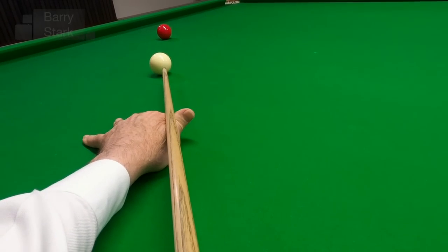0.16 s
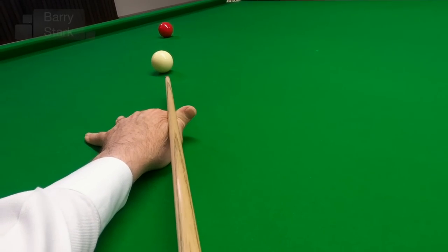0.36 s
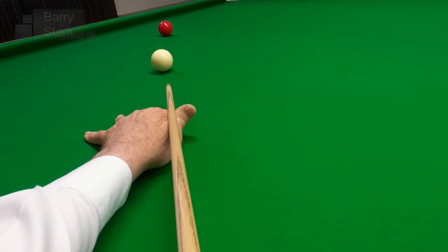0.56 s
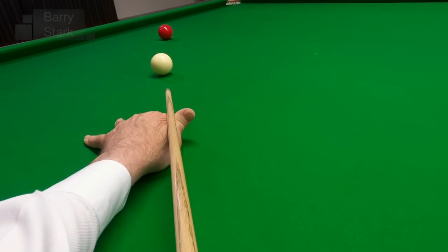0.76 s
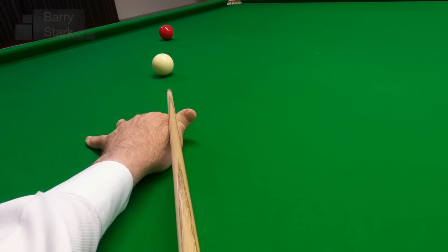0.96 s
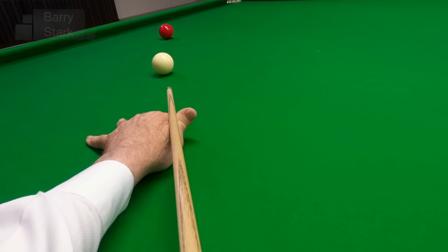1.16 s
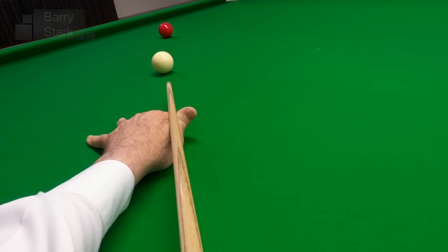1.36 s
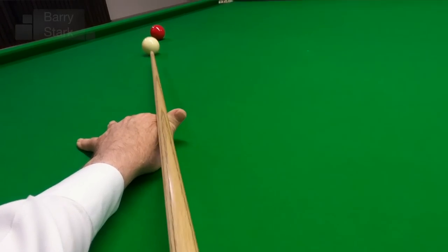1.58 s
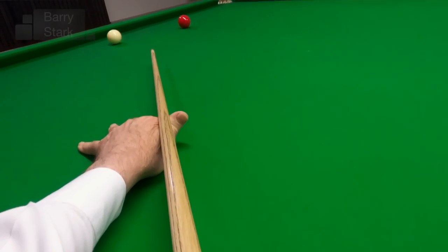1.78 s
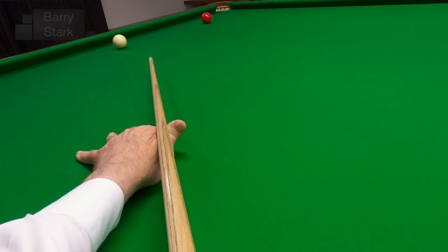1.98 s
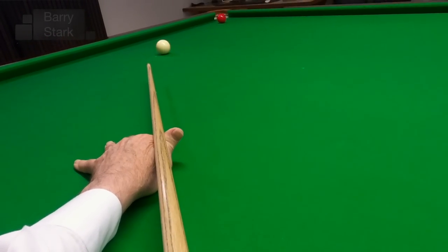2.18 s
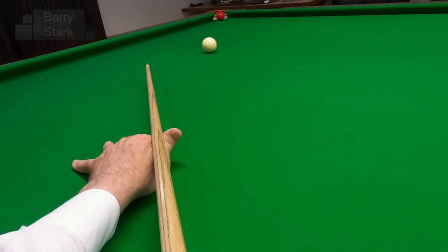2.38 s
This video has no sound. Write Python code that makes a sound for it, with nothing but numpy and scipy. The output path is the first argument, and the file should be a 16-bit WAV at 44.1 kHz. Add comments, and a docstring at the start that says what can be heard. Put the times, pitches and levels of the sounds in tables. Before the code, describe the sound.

A snooker shot, heard close behind the cue in a quiet hall: a woody crack, a sharp ball-on-ball click with a bright echo, then low rolling over cloth and three soft cushion thuds.

```python
"""A faint hum fills a quiet hall, and a snooker cue hisses softly over the player's hand.
Heard from just behind, the cue cracks against the white ball and its wooden shaft rings.
The white knocks down on the table, skids on the cloth and clicks against a red.
The hall answers with a long bright echo while the balls rumble over the slate
and, after a soft falling swish begins, thud into the rubber cushions."""
import sys
import numpy as np
from scipy import signal
from scipy.fft import rfft, irfft
from scipy.io import wavfile

SR = 44100
rng = np.random.default_rng(int(sys.argv[2]) if len(sys.argv) > 2 else 0)


def dump_mix(stems):
    """Bounce the given channels to the path in sys.argv[1] as a 16-bit WAV at rate SR."""
    frames = np.atleast_2d(stems).T  # one column per channel
    limited = np.clip(frames, -1, 1)  # hard clip at full scale
    pcm = np.round(limited * 32767).astype(np.int16)
    wavfile.write(sys.argv[1], SR, pcm)


N = 107295
T = np.arange(N) / SR
HZ = np.maximum(np.fft.rfftfreq(2 * N, 1 / SR), 1)

# Stereo width of the air and hiss (higher is wider): pitch_hz, side_db
AIR_WIDTH = [(60, -9.5), (250, 1), (700, -7), (2400, -5), (15000, -24.5)]
# Three blows, as the tip strikes and the white lands and settles:
# start_s, crack_db, shaft_db, knock_db, boom_db, brightness_db, thump_db, thump_hz, thump_fade_s
CUE_BLOWS = [(1.5630, -5, -16, -33.5, -42.5, -6, -18, 171, 0.07),
             (1.5930, -11.5, -26.5, -16.5, -40.5, 4, -24, 183, 0.099),
             (1.6215, -40, -42, -30.5, -45.5, -5, -27, 220, 0.27)]
# The deep notes of the table's boom: pitch_hz, level_db, fade_s
TABLE_NOTES = [(59.1, 2.5, 0.8), (97.6, -2, 1), (132.6, -15, 0.66), (182.2, -2, 1), (217.2, 5.5, 1),
               (329, 5.5, 0.1), (498, -4.5, 0.18), (643, -7.5, 0.14)]
# Stereo width of sound in the hall: pitch_hz, side_db
HALL_WIDTH = [(60, -32), (200, -29), (400, -15), (700, -17), (1300, -8.5), (2400, -4), (15000, -5.5)]


def amp(db):
    """Turn decibels into a number to multiply by."""
    return 10 ** (np.asarray(db) / 20)


def unit(x):
    """Scale a sound to an average (rms) strength of 1."""
    return x / np.sqrt(np.mean(x ** 2) + 1e-30)


def at_hz(tone):
    """Join (pitch_hz, level_db) points into a smooth curve over all pitches."""
    hz, db = np.transpose(tone)
    return np.interp(np.log(HZ), np.log(hz), db)


def level(points):
    """Join (time_s, level_db) points into a volume curve."""
    return amp(np.interp(T, *np.transpose(points)))


def delay(x, s):
    """Start a sound s seconds later."""
    return np.concatenate([np.zeros(max(round(s * SR), 0)), x])[:N]


def through(x, response):
    """Play a sound through something, given how that thing answers a single tap."""
    return signal.fftconvolve(np.atleast_2d(x), np.atleast_2d(response), axes=-1)[:, :N]


def noise(tone, width):
    """Stereo noise: a middle part both ears share, plus a side part that sets them apart."""
    white = rfft(rng.standard_normal((2, 2 * N)))
    mid, side = irfft(white * amp([at_hz(tone), at_hz(tone) + at_hz(width)]))[:, :N]
    return unit(np.array([mid + side, mid - side]))


def shortest_tap(tone):
    """The briefest tap that has the given tone (a minimum-phase response)."""
    cepstrum = irfft(np.log(amp(at_hz(tone))))
    cepstrum[1:N] *= 2  # fold what would come before the tap to after it
    cepstrum[N + 1:] = 0
    return irfft(np.exp(rfft(cepstrum)))[:N]


def pulse(tone):
    """One brief tap with a peak of 1."""
    tap = shortest_tap(tone)
    return tap / np.abs(tap).max()


def dying(fade_s):
    """A fade that drops 60 dB in fade_s seconds."""
    return amp(-np.minimum(60 * T / max(fade_s, 1e-4), 400))


def ring(hz, fade_s):
    """One struck note dying away."""
    return np.sin(2 * np.pi * hz * T) * dying(fade_s)


def body(notes):
    """All the notes of a struck object at once, every second one flipped upside down."""
    return sum((-1) ** k * amp(db) * ring(hz, fade_s) for k, (hz, db, fade_s) in enumerate(notes))


def room_hum():
    """The building gives a deep wavering hum, and the room's air swells softly."""
    # Loudness of the hum: time_s, level_db
    hum_levels = [(0, -51.5), (.17, -51.5), (.42, -63.5), (.56, -53), (.75, -53), (.97, -61), (1.25, -57),
                  (2.43, -62)]
    # Tone of the air: pitch_hz, level_db
    air_tone = [(25, -1), (55, 7), (85, -7), (130, -6.5), (200, -5), (290, -5.5), (400, -13), (600, -16.5),
                (3000, -26.5), (5400, -25), (15000, -34)]
    # Rise and fall of the air: time_s, boost_db
    air_swell = [(0, 5.5), (.35, 3.5), (.68, 0.5), (.95, 5.5), (1.2, 2), (1.5, 3), (2.43, 1.5)]
    hum_hz, air_db = 25.7, -66.5
    hum = np.sqrt(2) * level(hum_levels) * np.sin(2 * np.pi * hum_hz * T)
    return hum + amp(air_db) * level(air_swell) * noise(air_tone, AIR_WIDTH)


def cue_slide():
    """The cue hisses as it slides over the hand."""
    # Tone of the hiss: pitch_hz, level_db
    hiss_tone = [(1500, -3), (3800, -4), (5200, -1.5), (8200, -9), (10000, -13.5), (15000, -26)]
    # Loudness of the hiss: time_s, level_db
    hiss_levels = [(0, -90), (.25, -74), (.42, -73), (.7, -80), (.93, -84.5), (1.2, -105), (1.52, -66),
                   (1.6, -59.5), (1.64, -54), (1.7, -61), (1.92, -77), (2.1, -68.5), (2.27, -63.5),
                   (2.43, -63.5)]
    return level(hiss_levels) * noise(hiss_tone, AIR_WIDTH)


def aiming_ticks():
    """A few tiny ticks, each with a softened start, sound while the player aims."""
    # One row a tick: start_s, level_db, pitch_hz, fade_s
    ticks = [(.1055, -46.5, 3670, 0.011), (.169, -55.5, 810, .025), (.541, -56, 760, 0.013)]
    return sum(amp(db) * delay(ring(hz, fade_s) * (1 - dying(fade_s / 2)), start_s)
               for start_s, db, hz, fade_s in ticks)


def cue_stroke():
    """Each blow is a thump and a rattling crack that set the shaft and the table ringing."""
    # Tone of the crack: pitch_hz, level_db
    crack_tone = [(60, -26), (170, 0.5), (370, 6.5), (600, -5.5), (950, -4.5), (1200, 5), (1700, -8.5),
                  (2400, 2.5), (3600, 0), (4800, -10), (5700, -20.5), (8500, -23), (12000, -40.5),
                  (16000, -43)]
    # Ring of the cue's shaft: pitch_hz, level_db, fade_s
    shaft_notes = [(1155, -5.5, 0.096), (1575, -6, 0.044), (1980, -10, 0.07), (2354, 0.5, 0.057),
                   (2897, -5, 0.048), (3416, 0, 0.047), (3883, -4, 0.04), (4610, -1, 0.029),
                   (4980, -7, 0.033), (6494, -20, 0.025), (6840, -18, 0.019), (8660, -26, 0.018)]
    # Knock of the ball on the table top: pitch_hz, level_db, fade_s
    knock_notes = [(500, -13.5, 0.03), (600, -2, 0.029), (758, -6.5, 0.064), (865.6, -0.5, 0.086),
                   (983, -5, 0.041), (1174, -18, 0.18)]
    rattle_db, rattle_fade_s = 3.5, 0.023
    bright_from_hz, bright_full_hz = 1770, 6750
    tick_s, tick_db, left_lag_s = 1.5523, -24.5, 0.000023
    crack, shaft, knock, boom = pulse(crack_tone), body(shaft_notes), body(knock_notes), body(TABLE_NOTES)
    out = 0
    for k, row in enumerate(CUE_BLOWS):
        start_s, crack_db, shaft_db, knock_db, boom_db, bright_db, thump_db, thump_hz, thump_fade_s = row
        grains = unit(rng.standard_normal(N) * dying(rattle_fade_s)) / np.sqrt(N)
        rattle = amp(rattle_db) * through(crack, grains)[0]
        clack = amp(crack_db) * (crack + rattle) + amp(shaft_db) * shaft
        clack = through(clack, shortest_tap([(bright_from_hz, 0), (bright_full_hz, bright_db)]))[0]
        thump = amp(thump_db) * ring(thump_hz, thump_fade_s)
        blow = clack + amp(knock_db) * knock + amp(boom_db) * boom + thump
        out = out + np.array([delay(blow, start_s + left_lag_s * (k == 0)), delay(blow, start_s)])
        if k == 0:  # a faint tick comes just ahead of the stroke
            out = out + amp(tick_db) * delay(clack, tick_s)
    return out


def rolling():
    """Once struck, the balls rumble over the cloth and keep the table's notes ringing."""
    # Loudness of the rolling: time_s, level_db
    roll_levels = [(1.565, -32.5), (1.64, -41.5), (1.71, -45), (1.8, -37.5), (1.89, -42), (1.95, -37.5),
                   (2.02, -41.5), (2.06, -44), (2.11, -47), (2.18, -53.5), (2.43, -52.5)]
    # Tone of the rumble: pitch_hz, level_db
    roll_tone = [(20, -29), (55, 3.5), (120, 3), (230, -2), (300, -9.5), (600, -19.5), (1000, -21.5),
                 (2500, -53), (8000, -70)]
    start_s, rise_s, ringing_db = CUE_BLOWS[0][0], 0.005, -5.5
    rumble = noise(roll_tone, HALL_WIDTH)
    ringing = amp(ringing_db) * unit(through(rumble, body(TABLE_NOTES)))
    moving = np.clip((T - start_s) / rise_s, 0, 1)
    return moving * level(roll_levels) * unit(rumble + ringing)


def hall_echo(sound):
    """The hall returns a few quick echoes and a wash of sound that sags slowly, then dies away."""
    # Tone of the hall: pitch_hz, level_db
    hall_tone = [(60, -14.5), (140, -0.5), (230, 0.5), (400, -5), (900, -8.5), (1400, 0), (2500, 0),
                 (3800, -6.5), (4700, -14), (5600, -21), (9000, -25), (15000, -10)]
    # How long each band of pitches takes to die: pitch_hz, fade_s
    band_fades = [(100, 0.19), (500, 0.15), (1200, 0.7), (3000, 0.76), (6000, 1), (14000, 0.32)]
    # Echoes off nearby surfaces: delay_s, level_db
    echoes = [(0.0206, -16.5), (0.0234, -18), (.041, -36)]
    hall_db, left_lead_db = -2, 1.5
    gap_s, hold_s, sag_db_per_s = 0.014, 0.17, 23
    white = rfft(noise([(20, 0), (20000, 0)], HALL_WIDTH), 2 * N)
    centres_hz, fades_s = np.transpose(band_fades)
    tail = 0
    for share, fade_s in zip(np.eye(len(centres_hz)), fades_s):
        band = irfft(white * np.interp(np.log(HZ), np.log(centres_hz), share))[:, :N]
        tail = tail + band * amp(-60 * np.maximum(T - hold_s, 0) / fade_s)
    sag = amp(-sag_db_per_s * np.minimum(T, hold_s))
    tail = unit(tail * sag * (T > gap_s)) / np.sqrt(N)
    for delay_s, db in echoes:
        tail[:, int(delay_s * SR)] += amp(db)
    tail = irfft(rfft(tail, 2 * N) * amp(at_hz(hall_tone)))[:, :N]
    return amp(hall_db + left_lead_db * np.array([[.5], [-.5]])) * through(sound, tail)


def skid():
    """The white slides on the cloth after it lands, fading as it starts to roll."""
    # Tone of the rubbing cloth: pitch_hz, level_db
    skid_tone = [(100, -15), (250, 1.5), (450, -1), (700, -1), (1150, -2.5), (1600, -26), (8000, -65)]
    start_s, level_db = 1.6, -29
    return amp(level_db) * noise(skid_tone, HALL_WIDTH) * delay(dying(fade_s=0.6), start_s)


def ball_click():
    """Two hard balls meet in one sharp tap that rings very briefly."""
    # Tone of the tap: pitch_hz, level_db
    click_tone = [(60, -26), (300, -12.5), (700, -5.5), (1250, -0.5), (1750, -1.5), (2500, 2), (3400, -2),
                  (4300, -10.5), (5300, -22), (8000, -22.5), (11000, -35.5), (16000, -41)]
    # Ring after the tap: pitch_hz, level_db, fade_s
    click_notes = [(1250, -33, 0.0051), (2510, -23, .012)]
    start_s, level_db = 1.7175, -1.5
    return -amp(level_db) * delay(pulse(click_tone) + body(click_notes), start_s)


def table_reflection(click):
    """The table throws the click back, narrower in tone and a little later on the left."""
    centre_hz, width_hz, boost_db = 2600, 2600, 3.5
    delay_s, left_lag_s = 0.00178, 0.000045
    band = signal.iirpeak(centre_hz, centre_hz / width_hz, SR)
    bounce = amp(boost_db) * signal.lfilter(*band, click + 1e-18)
    return np.array([delay(bounce, delay_s + left_lag_s), delay(bounce, delay_s)])


def swish():
    """A soft swish, perhaps a sleeve: a narrow band of noise slides down in pitch."""
    # Path of the swish: time_s, pitch_hz, level_db
    glide = [(1.949, 8700, -90), (2.048, 8000, -79), (2.201, 5890, -73), (2.298, 5180, -66.5),
             (2.43, 4510, -80)]
    half_width_hz = 370
    times_s, hz, db = np.transpose(glide)
    flutter = unit(signal.lfilter(*signal.butter(2, half_width_hz, fs=SR), rng.standard_normal((2, N))))
    phase = 2 * np.pi * np.cumsum(np.interp(T, times_s, hz)) / SR
    band = flutter[0] * np.cos(phase) + flutter[1] * np.sin(phase)
    return amp(np.interp(T, times_s, db)) * (T > times_s[0]) * band


def cushion_thuds():
    """A ball hits the rubber, which gives a soft low note and a dull puff and shakes the table."""
    # One row a thud: start_s, level_db, pitch_hz, puff_db
    thuds = [(2.2075, -31.5, 207, -7), (2.2490, -40.5, 183, -8), (2.3866, -28.5, 173.6, -16.5)]
    # Tone of the puff: pitch_hz, level_db
    puff_tone = [(50, 7), (200, 1), (480, -2.5), (850, -13), (1500, -24), (4000, -31.5), (12000, -77)]
    rise_s, boom_db = 0.0031, -23
    boom = amp(boom_db) * body(TABLE_NOTES)
    soft_start = 1 - np.exp(-T / rise_s)
    out = 0
    for start_s, db, hz, puff_db in thuds:
        puff = noise(puff_tone, HALL_WIDTH)[0] * dying(fade_s=0.34)
        thud = ring(hz, fade_s=0.14) + boom + amp(puff_db) * puff
        out = out + amp(db) * delay(thud * soft_start, start_s)
    return out


def scene():
    """Add up the hits, the hall's answer to them, the movement and the quiet background."""
    cue_to_hall_db, click_to_hall_db = -3, 3.5
    cue, click, thuds = cue_stroke(), ball_click(), cushion_thuds()
    hits = cue + click + table_reflection(click) + thuds
    echo = hall_echo(amp(cue_to_hall_db) * cue + amp(click_to_hall_db) * click + thuds)
    return hits + echo + skid() + rolling() + swish() + room_hum() + cue_slide() + aiming_ticks()


def record(dry):
    """Round off the loudest peaks and cut the very highest treble."""
    ceiling, stop_hz = 0.84, 16960
    rounded = dry / (1 + (dry / ceiling) ** 6) ** (1 / 6)
    return signal.sosfilt(signal.cheby2(12, 70, stop_hz, fs=SR, output="sos"), rounded)


dry = scene()
out = record(dry)
dump_mix(out)
```